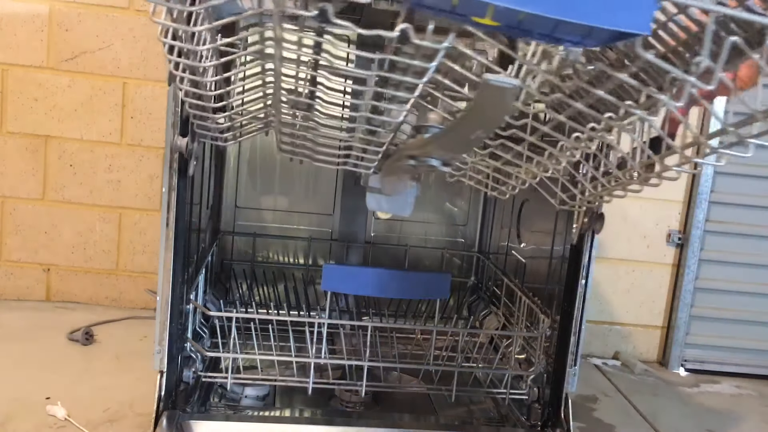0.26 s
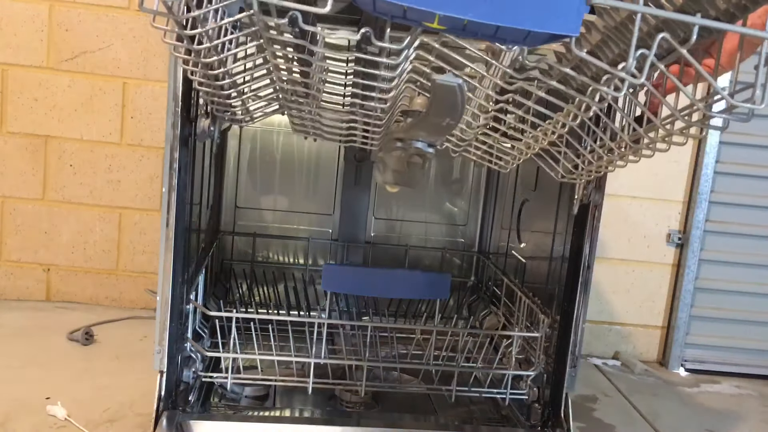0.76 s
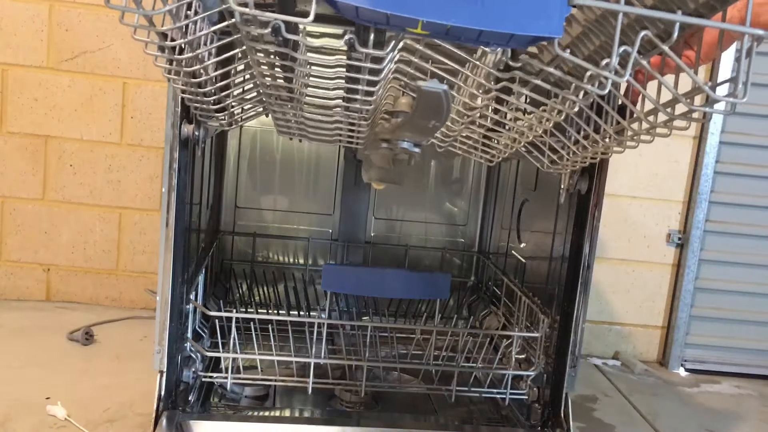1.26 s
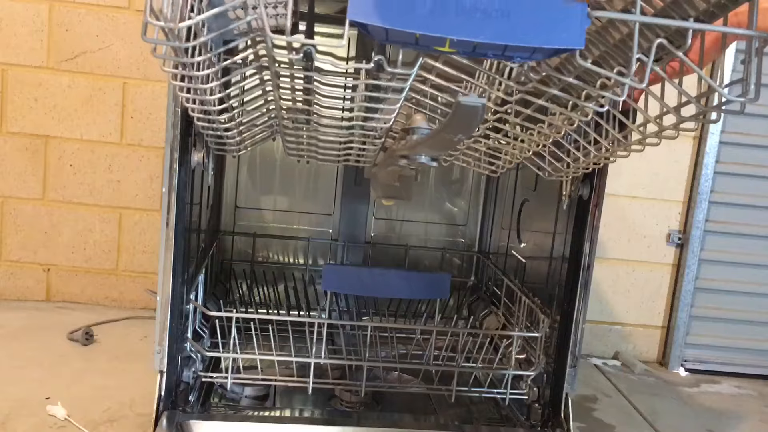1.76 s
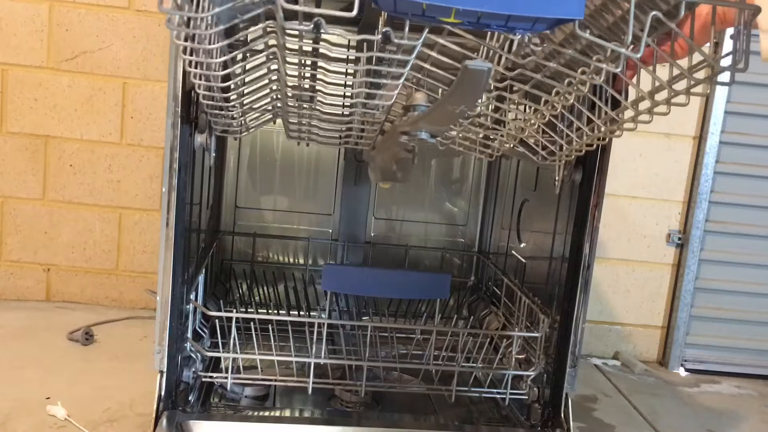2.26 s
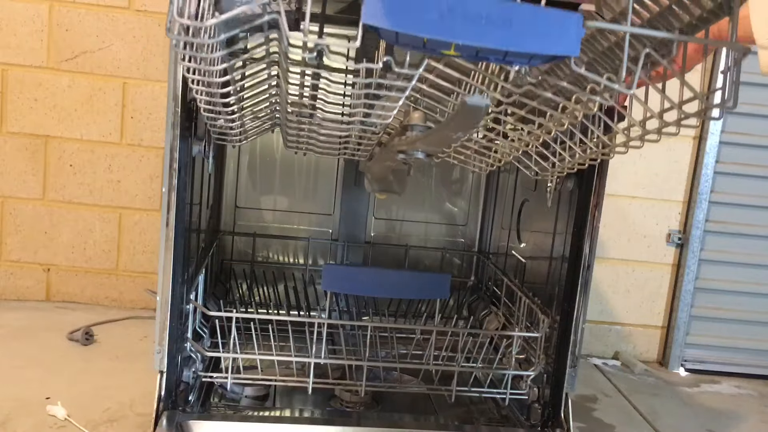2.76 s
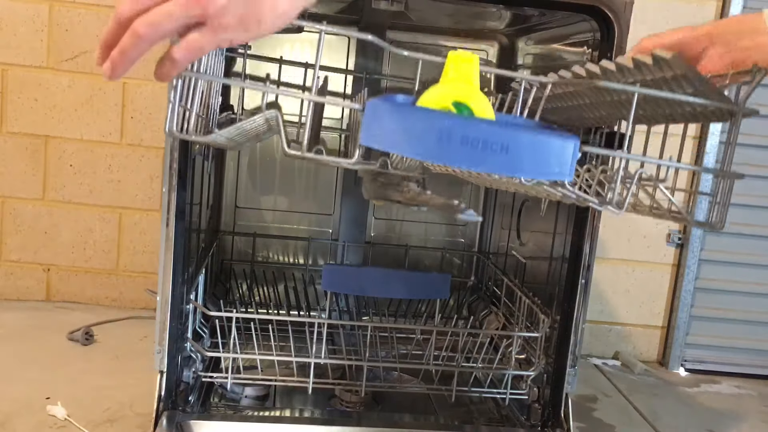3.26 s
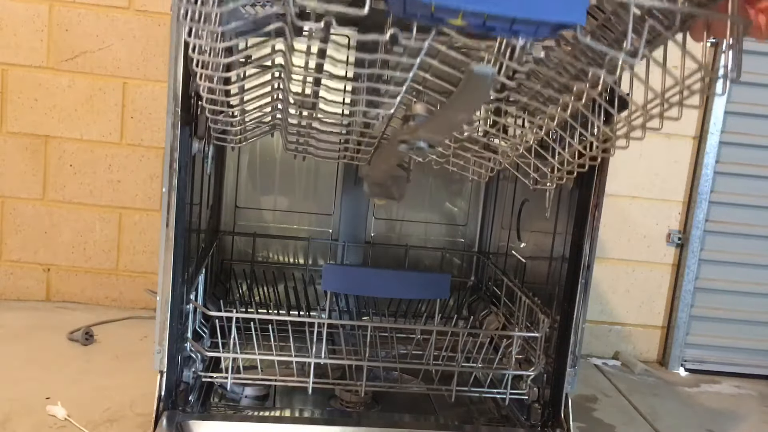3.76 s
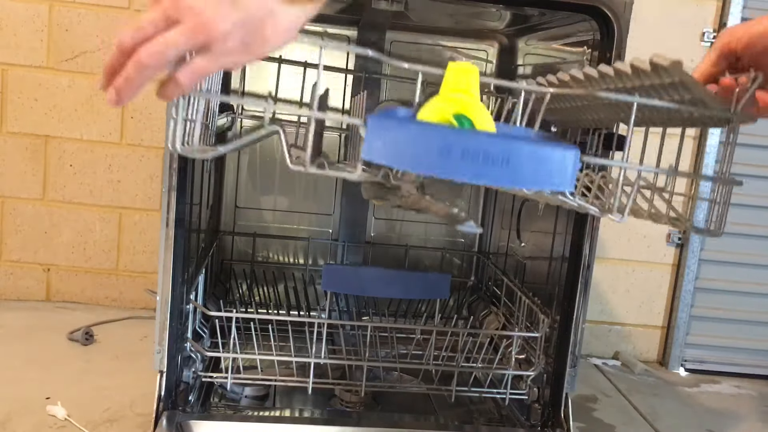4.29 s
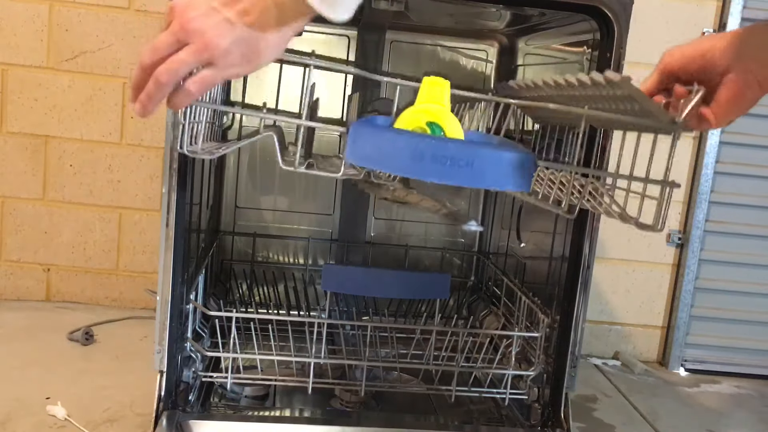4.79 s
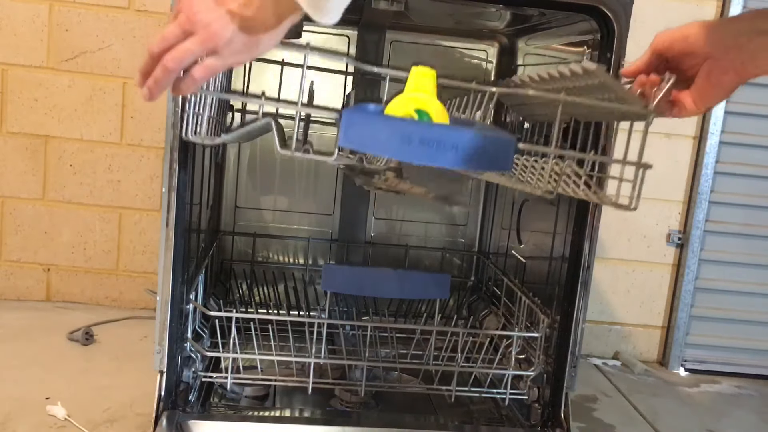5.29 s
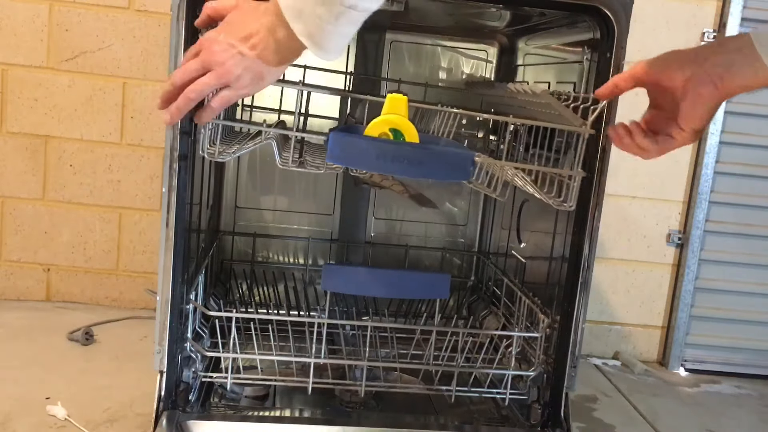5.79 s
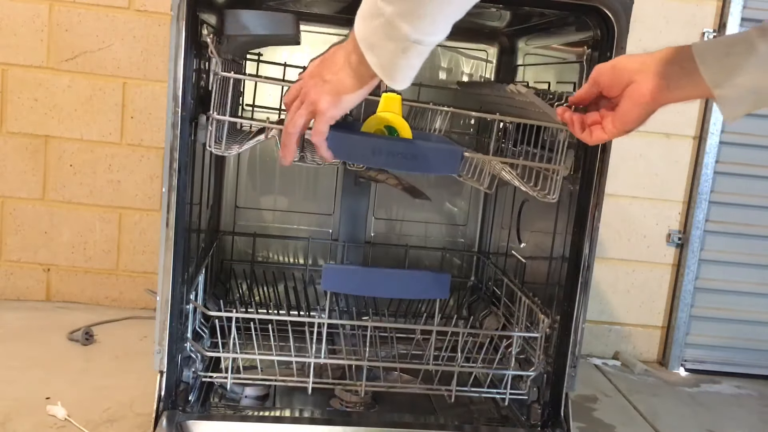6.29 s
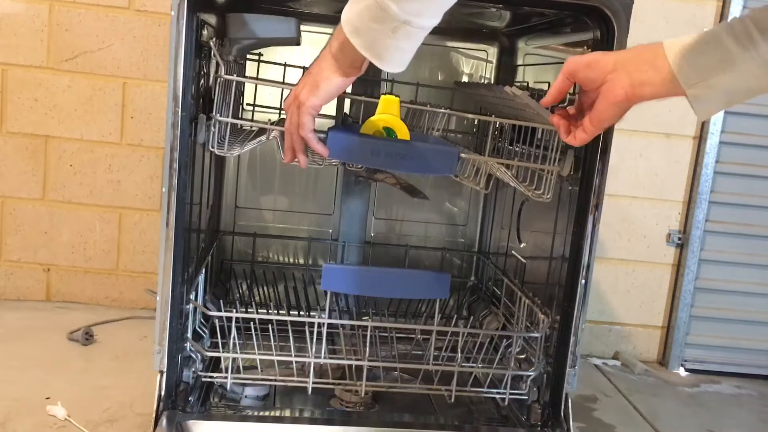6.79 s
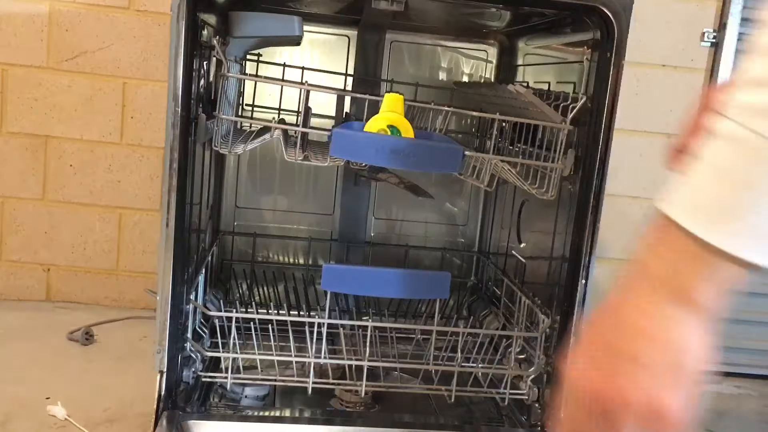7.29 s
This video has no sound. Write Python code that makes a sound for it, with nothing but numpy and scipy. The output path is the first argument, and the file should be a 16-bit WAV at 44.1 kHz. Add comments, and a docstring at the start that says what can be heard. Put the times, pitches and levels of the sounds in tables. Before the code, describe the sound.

Loose wire basket rattles and knocks in a steel tub with deep booms, slides inward with a faint hiss, and ends in a hard double clack.

```python
"""In a hard-walled room, a wire rack is jiggled onto its rails in an empty dishwasher, rolled in and
clacked against the back stop. Each knock is a short chatter of contacts, the direct sound ahead of echoes
in the tub and the room; it rings the wires and makes the steel tub boom. Rollers rumble as shaped noise,
loose wires tick, the rails hiss and sing faintly and a hand brushes the rack, all over quiet room tone.
The microphone has a low cut and the recorder a band limit."""
import sys
import numpy as np
from scipy import signal
from scipy.fft import rfft, irfft, next_fast_len
from scipy.io import wavfile
from scipy.ndimage import uniform_filter1d

SR = 44100
rng = np.random.default_rng(int(sys.argv[2]) if len(sys.argv) > 2 else 0)


def output_pcm(signal):
    """Save a mono or channel-first signal as 16-bit PCM at the path in sys.argv[1].

    Samples are clipped to [-1, 1] before scaling.
    """
    pcm = np.clip(np.atleast_2d(signal).T, -1, 1) * 32767
    wavfile.write(sys.argv[1], SR, np.round(pcm).astype(np.int16))


N = 332514

# quiet room tone, spectrum: [f/Hz, density level/dB]
AIR_COLOUR = [(15, -28), (25, -4), (76, 3), (620, -12.5), (1600, -14), (2350, -18), (3700, -21.5),
              (12500, -29.5), (16000, -37.5)]
# rumble of the rollers and the swaying rack: [t/s, level/dB]
RUMBLE_LEVEL = [(0, -58.5), (.7, -71.5), (1.9, -63), (2.1, -49), (2.8, -54), (3.45, -51.5), (3.8, -63.5),
                (4.2, -59.5), (4.33, -41), (5.2, -48), (7.1, -55), (7.4, -69)]
# hiss of the rails, spectrum: [f/Hz, density level/dB]
RAIL_COLOUR = [(150, -13), (330, 8.5), (900, -2), (2800, 2), (4400, -2), (6000, -0.5), (8000, -10),
               (10500, -5.5), (13000, -18), (16000, -26)]
# pushes of the rack along the rails: [start t/s, end t/s, level at the start/dB]
RAIL_PUSHES = [(4.376, 6.063, -53.5), (6.057, 6.435, -61)]
# a hand brushes the rack: [start t/s, length/s, level at start/dB, level at end/dB]
HAND_SCUFFS = [(3.477, 0.18, -61.5, -69), (6.866, 0.11, -63, -69)]
# spectrum of a scuff: [f/Hz, density level/dB]
SCUFF_COLOUR = [(120, -40), (600, -6), (2200, 0), (4300, -15), (5800, -3), (7200, -8), (11000, -10),
                (16000, -22)]
# heavy bumps, the last two at the back stop: [t/s, level/dB, factor on the wall's mode frequencies]
WALL_BUMPS = [(0.788, -14.5, 2.35), (1.566, 1, 1.5), (4.438, 11.5, 1.2), (6.344, 9.5, 1),
              (6.3795, 16, 1.005)]
# modes of the bumped wall, before the bump's factor: [f/Hz, level/dB, t60/s]
WALL_MODES = [(49.8, -7.5, 0.18), (105.3, 2, 0.34), (307, -16, 0.4), (368, -13.5, 0.24)]
# diffuse boom of tub and room, also the rumble's spectrum: [f/Hz, density level/dB]
BOOM_COLOUR = [(15, -66.5), (27, -46), (45, -6), (85, -5), (110, 1.5), (135, 0), (170, -8.5), (210, -16),
               (270, -21.5), (340, -17), (500, -33.5), (900, -84)]
# panel modes of the tub, before each blow's scatter: [f/Hz, level/dB, t60/s]
TUB_MODES = [(54, -18.5, .4), (91, -9, 0.98), (105.3, -1.5, 0.7), (119.87, 4.5, 0.38), (139.2, 3.5, 0.44),
             (198.7, -4.5, 0.61), (214.2, -9, 0.38), (305, -8, .6), (433, -27, 0.58)]
# reverberation of the room: [f/Hz, t60/s]
ROOM_DECAY = [(100, 1), (300, 0.72), (700, 0.6), (1800, 0.77), (4800, 0.48), (9000, 0.39), (14000, 0.27)]
# modes of the wire basket, before each blow's scatter: [f/Hz, level/dB, t60/s]
BASKET_MODES = [(574, 8, 0.59), (685, 2.5, 0.78), (1356, -12, 0.56), (1475, 12.5, 0.42), (1644, -13, 0.33),
                (1770, -5, 0.4), (2310, 2, 1), (2490, -3, 1), (2790, 7, 0.5), (3037, -18, 0.39),
                (3080, -1, 0.48), (3170, -9.5, 0.47), (4180, 3.5, 0.54), (4350, 0, 0.8), (5070, -13.5, 1),
                (4860, 1.5, 0.56), (6200, -5, 0.18), (6660, 3.5, .35)]
# rows of near-alike tines ring in tight clusters: [centre f/Hz, half width f/Hz, level before scatter/dB]
TINE_ROWS = [(3360, 98, -12.5), (5450, 180, 1), (8350, 480, -2)]
# spectrum of a contact: [f/Hz, density level/dB]
CONTACT_COLOUR = [(120, -50), (230, -14.5), (320, -4), (480, -10), (650, -11.5), (850, -13), (1550, -10.5),
                  (2300, -10.5), (3300, -8), (4400, -10), (5200, -8.5), (6400, -10), (7200, -12.5),
                  (10100, -14.5), (13000, -23), (16000, -31.5)]
# knocks of rack, rollers and rails:
# [t/s, chatter length/s, level/dB, low-mid level/dB, treble level/dB, struck wire f/Hz, tub boom level/dB]
RACK_KNOCKS = [ (0.0, 0.017, -22.5, 4, -7.5, 3230, -31), (0.781, 0.0081, -22.5, 11.5, -7.5, 3220, -8.5),
               (1.247, 0.031, -12.5, -5, -5.5, 3100, -16), (1.394, 0.011, -20.5, 10, -7, 3130, -20),
               (1.522, 0.019, 0.5, -5.5, -3, 2860, 0), (1.549, .008, -12.5, 5, 2.5, 8800, 1.5),
               (1.638, 0.013, -13, 1.5, -4, 2200, -93), (1.695, 0.021, -15, 1.5, -9, 3130, -4.5),
               (1.74, 0.012, -16, -5, -15, 2950, -10), (1.965, 0.0108, -22.5, -8, -5.5, 9000, -17),
               (2.009, 0.0089, -21, -6, -11, 3600, -12), (2.085, 0.043, -10.5, -2, -8.5, 3370, -9.5),
               (2.194, 0.01, -10.5, -16, -8, 3440, -15), (2.205, 0.0033, -6.5, -0.5, -11, 2800, -3.5),
               (2.281, 0.015, -6, -2, 5, 9700, 4), (2.289, 0.0088, -4.5, 0, 1.5, 5750, -2),
               (2.362, 0.0075, -3, 4.5, -2, 6030, 0.5), (2.886, 0.018, -24.5, 10.5, -10.5, 2480, -10),
               (2.957, 0.0055, -2, -9.5, -4, 3260, -0.5), (2.973, 0.019, -6.5, 3.5, -7, 5430, -1.5),
               (3.476, 0.0046, -39, 16.5, 13, 8600, -9.5), (3.865, 0.0061, -17.5, 4, -3, 6300, -5.5),
               (4.253, 0.0027, -26, 7.5, -1.5, 6330, -4.5), (4.306, 0.027, -17, 4, -5.5, 2400, -0.5),
               (4.395, .009, -9, 9, -11, 4330, -7.5), (4.41, .023, 5.5, -6.5, -3, 5400, 14),
               (4.438, 0.011, 1, -1.5, 1, 3100, -10.5), (4.453, 0.016, -10.5, 6, 7, 8800, -17.5),
               (4.775, 0.016, -12, 6, -5, 5600, 2.5), (4.795, .021, 11, -3, 0.5, 6400, 11),
               (4.973, 0.017, -12.5, 3.5, -6, 3040, -1), (5.074, .009, -9.5, -0.5, -5, 5360, -3.5),
               (5.216, 0.0082, -13.5, -0.5, -5.5, 2800, -5.5), (5.407, 0.0065, -11, 2, -3.5, 2770, -6.5),
               (5.448, 0.019, -6.5, -2.5, -3.5, 2780, -7.5), (5.766, 0.0083, -19, 0.5, -9.5, 2610, -15),
               (5.965, 0.008, -27.5, 3, -17.5, 2700, -14), (6.109, 0.0054, -33, 14, -6, 2770, -13),
               (6.3397, .002, 1, 0, -7.5, 2500, -5), (6.3773, .0045, 0.5, 5.5, -5, 1540, 2.5),
               (6.935, .006, -35, 0, -6, 2196, -36)]

AIR_DB = -64.5
PUSH_RISE_S, PUSH_RELEASE_S, PUSH_SAG_DB_PER_S = 0.11, 0.15, 5
SING_DB = -14.5  # thin singing of the rails, relative to their hiss
# light ticks of loose wires while the rack is moved; mean level above the rumble, mean pitch
TICKS_FROM_S, TICKS_TO_S, TICK_LENGTH_S = 1.4, 4.6, 0.0048
TICK_DB, TICK_SPREAD_DB, TICK_LOW_DB, TICK_TREBLE_DB, TICK_HZ = 14, 4.5, 8.5, -15.5, 2670
# the deepest boom (38 to 70 Hz) is shallow until the rack's weight sits on both rails
SEATED_S, LOOSE_DEPTH_DB, SEATED_DEPTH_DB = 2.7, -8, -2.5
TINES_T60_S = .55
# the struck wire and its neighbours ring on
STRUCK_DB, STRUCK_WIDTH_HZ, STRUCK_T60_S = -23, 150, .55
PING_DB = -6.5  # clinks of single wires, relative to the chatter
# after each strike the rack drops back in a longer, duller chatter; levels relative to the strike
SETTLE_AFTER_S, SETTLE_STRETCH = .015, 3.5  # stretch: its length over the strike's
SETTLE_DB, SETTLE_LOW_DB, SETTLE_TREBLE_DB = -7.5, 5, -11.5
LOOSE_CHATTER_S = .009  # strikes at least this long settle fully


def amp(db):
    """Amplitude factor of a level in dB."""
    return 10 ** (np.asarray(db) / 20)


def unit_rms(x):
    """Scales a steady sound to rms 1."""
    return x / np.sqrt(np.mean(x ** 2) + 1e-20)


def unit_energy(x):
    """Scales a transient to energy 1."""
    return x / np.sqrt(np.sum(x ** 2) + 1e-20)


def seconds(size):
    """Time axis of a given number of samples."""
    return np.arange(size) / SR


def dying(t60):
    """One second of exponential decay, down 60 dB after t60."""
    return np.exp(-np.log(1000) * seconds(SR) / t60)


def read(points, hz):
    """Value of a table on a log-frequency axis."""
    f, value = np.transpose(points)
    return np.interp(np.log(hz + 1), np.log(f + 1), value)


def level(points):
    """Gain over the whole scene from rows of [t/s, level/dB]."""
    return amp(np.interp(seconds(N), *np.transpose(points)))


def add(mix, s, sound):
    """Lays a sound into the mix at a time."""
    part = mix[max(round(s * SR), 0):][:len(sound)]
    part += sound[:len(part)]


def shaped(x, points):
    """A noise given a spectrum, at rms 1."""
    size = next_fast_len(len(x))
    gain = amp(read(points, np.fft.rfftfreq(size, 1 / SR)))
    return unit_rms(irfft(rfft(x, size) * gain, size)[:len(x)])


def causal(gain_db):
    """Minimum-phase impulse response of a gain curve: sharp front, ringing behind."""
    log_gain = np.log(amp(np.r_[gain_db, gain_db[-2:0:-1]]))
    return np.fft.ifft(np.exp(np.conj(signal.hilbert(log_gain)))).real[:len(gain_db)]


def ring(modes, scatter=1):
    """Dying modes; where the blow lands scatters their strengths and phases."""
    hz, db, t60 = np.transpose(modes)[:, :, None]
    t = seconds(SR).astype(np.float32)
    strength, phase = scatter * rng.standard_normal((2, len(modes), 1))
    size = np.float32(amp(db + 2 * strength)) * np.exp(np.float32(-np.log(1000) / t60) * t)
    swing = np.sin(np.float32(2 * np.pi * hz) * t + np.float32(np.pi * phase))
    return unit_energy((size * swing).sum(0).astype(float))


def wander(per_s):
    """Random drift of rms 1, with little movement faster than the given rate."""
    return shaped(rng.standard_normal(N), [(per_s, 0), (2 * per_s, -20), (10 * per_s, -120)])


def air():
    """Steady noise of the quiet room."""
    return amp(AIR_DB) * shaped(rng.standard_normal(N), AIR_COLOUR)


def glide():
    """Strength of the sliding: each push takes hold, slowly slackens and stops."""
    t = seconds(N)
    strength = np.zeros(N)
    for start, end, db in RAIL_PUSHES:
        hold = np.clip((t - start) / PUSH_RISE_S, 0, 1)
        release = np.clip((end - t) / PUSH_RELEASE_S, 0, 1)
        strength += hold * release * amp(db - PUSH_SAG_DB_PER_S * (t - start))
    return strength


def rolling(sing_hz=10500, waver_hz=170, width_hz=330):
    """Rollers shake the tub; pushed rails hiss and sing, the singing's pitch and level drifting together."""
    rumble = level(RUMBLE_LEVEL) * shaped(rng.standard_normal(N), BOOM_COLOUR)
    grit = rng.standard_normal(N) * amp(1.7 * wander(120))
    drift = wander(6)
    carrier = np.cos(2 * np.pi * np.cumsum(sing_hz + waver_hz * drift) / SR)
    sing = unit_rms(wander(width_hz) * carrier)  # a narrow band of noise
    return rumble + glide() * (shaped(grit, RAIL_COLOUR) + amp(SING_DB + drift) * sing)


def scuffs():
    """Brief soft rubbing that fades as the contact eases."""
    out = np.zeros(N)
    for s, length, start_db, end_db in HAND_SCUFFS:
        rub = shaped(rng.standard_normal(SR), SCUFF_COLOUR)[:round(length * SR)]
        fade = amp(np.linspace(start_db, end_db, len(rub)))
        add(out, s, rub * fade * signal.windows.tukey(len(rub), .35))
    return out


def ticks(count=24):
    """Loose wires tick at random, louder the more the rack is shaken."""
    out = np.zeros(N)
    for k, (when, force, pitch) in enumerate(2 * rng.random((count, 3)) - 1):
        # one tick anywhere in each equal slot of time
        s = TICKS_FROM_S + (TICKS_TO_S - TICKS_FROM_S) * (k + .5 + .5 * when) / count
        db = np.interp(s, *np.transpose(RUMBLE_LEVEL)) + TICK_DB + TICK_SPREAD_DB * force
        tick = clack(TICK_LENGTH_S, TICK_LOW_DB, TICK_TREBLE_DB, TICK_HZ * (1 + .15 * pitch))
        add(out, s, amp(db) * tick)
    return out


def bumps(swell=0.0035):
    """The rack's weight pushes a wall of the tub, whose few modes answer in a deep note."""
    out = np.zeros(N)
    for s, db, pitch in WALL_BUMPS:
        modes = np.array(WALL_MODES) * [pitch, 1, 1]
        add(out, s, amp(db) * ring(modes, scatter=0) * (1 - np.exp(-seconds(SR) / swell)))
    return out


def boom(depth_db, diffuse_t60=0.59, swell=0.0098):
    """The jolt travels down the rails and the tub's panels swing up after it."""
    diffuse = unit_energy(shaped(rng.standard_normal(SR), BOOM_COLOUR) * dying(diffuse_t60))
    swing_up = (1 - np.exp(-seconds(SR) / swell)) ** 2
    panels = unit_energy((diffuse + amp(0.5) * ring(TUB_MODES)) * swing_up)
    depth = [(15, -25), (38, depth_db), (70, depth_db), (110, 0)]  # [f/Hz, gain/dB]
    return signal.fftconvolve(panels, causal(read(depth, np.fft.rfftfreq(16384, 1 / SR))))[:SR]


def tail(t60s, rise, patchy_db=1.5):
    """Dense echoes that swell briefly, then die at each band's own speed; bands are uneven in strength."""
    hz, t, z = signal.stft(rng.standard_normal(SR), SR, nperseg=512)
    patches = amp(patchy_db * rng.standard_normal((len(hz), 1)))
    decay = np.exp(-np.log(1000) * t / read(t60s, hz)[:, None])
    echoes = signal.istft(z * patches * decay, SR)[1][:SR]
    return unit_energy(echoes * (1 - np.exp(-seconds(SR) / rise)))


def tines(scatter_db=3):
    """Many close modes beat against one another in a metallic shimmer."""
    hz = np.fft.rfftfreq(SR, 1 / SR)
    luck_db = scatter_db * rng.standard_normal(len(TINE_ROWS))  # each blow favours other rows
    gain = np.zeros(len(hz))
    for (centre, width, db), luck in zip(TINE_ROWS, luck_db):
        gain += amp(db + luck) * np.exp(-((hz - centre) / width) ** 2)
    return unit_energy(irfft(rfft(rng.standard_normal(SR)) * gain) * dying(TINES_T60_S))


def cluster(hz, width_hz, t60):
    """Near-alike wires beat against one another in a narrow, dying shimmer."""
    gain = np.exp(-((np.fft.rfftfreq(SR, 1 / SR) - hz) / width_hz) ** 2)
    return unit_energy(irfft(rfft(rng.standard_normal(SR)) * gain) * dying(t60))


def pings(length, count=14, low_hz=1500, high_hz=11000, ring_s=0.0032, spread_db=4):
    """Single wires clink within a chatter, each briefly at its own pitch."""
    t, out = seconds(2048), np.zeros(4096)
    for when, pitch, force in rng.random((count, 3)):
        hz = low_hz * (high_hz / low_hz) ** pitch
        db = -spread_db * np.log(1 - force) - 10 * when  # a few loud ones, later ones weaker
        clink = np.sin(2 * np.pi * hz * t) * np.exp(-t / ring_s)
        add(out, 2 * length * when, amp(db) * clink)
    return unit_energy(out)


def chatter(length, swell=0.39, spread_db=3, clump_db=4):
    """Tiny metal contacts of uneven size crowd in by clumps, then thin out."""
    sign, force, clumps = rng.standard_normal((3, 4096))
    clumps = np.tanh(unit_rms(uniform_filter1d(clumps, size=70)))
    u = seconds(len(sign)) / max(swell * length, 1e-4)
    contacts = sign * amp(spread_db * force + 2 * clump_db * clumps)
    return unit_energy(contacts * u * np.exp(-u))


def clack(length, low_db, treble_db, spot_hz, spot_db=4.5, spot_octaves=0.13):
    """Chatter coloured by the struck spot, ringing on in the wires, the tub and the room."""
    hz = np.fft.rfftfreq(2048, 1 / SR)
    spot = np.exp(-(np.log2((hz + 1) / spot_hz) / spot_octaves) ** 2)
    colour_db = read(CONTACT_COLOUR, hz) + spot_db * spot
    low_mids = read([(900, 1), (1800, 0)], hz)
    treble = read([(3300, 0), (5500, 1)], hz)
    hardness_db = low_db * low_mids + treble_db * treble
    colour = causal(colour_db + hardness_db) / np.linalg.norm(causal(colour_db))
    near = amp(-2.5) * tail([(500, 0.14), (10000, 0.076)], rise=0.0025)  # echoes inside the tub
    near[0] += 1  # the direct sound
    basket = amp(-14.0) * ring(BASKET_MODES, scatter=0.49) + amp(-16) * tines()
    basket += amp(STRUCK_DB) * cluster(spot_hz, STRUCK_WIDTH_HZ, STRUCK_T60_S)
    room = amp(-3.0) * tail(ROOM_DECAY, rise=0.0024)
    build_up = 1 - np.exp(-2 * seconds(SR) / length)  # ringing grows while the chatter lasts
    contacts = unit_energy(chatter(length) + amp(PING_DB) * pings(length))
    close = signal.oaconvolve(contacts, near)[:SR]
    return signal.oaconvolve(close + (basket + room) * build_up, colour)[:SR]


def knocks():
    """Every knock is a bright strike and a duller settling of the rack, over a low boom."""
    out = np.zeros(N)
    for s, length, db, low_db, treble_db, spot_hz, boom_db in RACK_KNOCKS:
        add(out, s, amp(db) * clack(length, low_db, treble_db, spot_hz))
        settle = clack(SETTLE_STRETCH * length, low_db + SETTLE_LOW_DB,
                       treble_db + SETTLE_TREBLE_DB, spot_hz)
        looseness = min(length / LOOSE_CHATTER_S, 1)  # a short, square hit leaves little to settle
        add(out, s + SETTLE_AFTER_S, amp(db + SETTLE_DB) * looseness * settle)
        depth_db = LOOSE_DEPTH_DB if s < SEATED_S else SEATED_DEPTH_DB
        add(out, s, amp(boom_db) * boom(depth_db))
    return out


def scene():
    """The rack's knocks and travel over the room tone, as one channel."""
    return (air() + rolling() + scuffs() + ticks() + bumps() + knocks())[None]


def record(dry):
    """The microphone's low cut at 28 Hz and the recorder's band limit at 16.1 kHz."""
    low_cut = signal.butter(2, 28, "highpass", fs=SR, output="sos")
    band_limit = signal.firwin(511, 16100, window=("kaiser", 9), fs=SR)
    return signal.oaconvolve(signal.sosfilt(low_cut, dry), band_limit[None], "same")


dry = scene()
out = record(dry)
output_pcm(out)
```